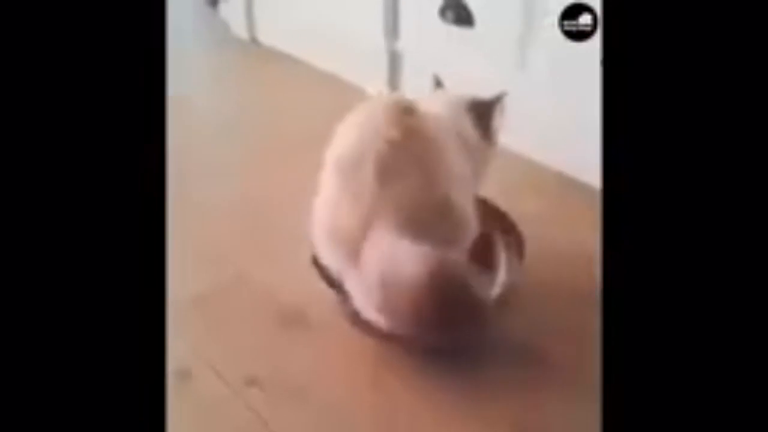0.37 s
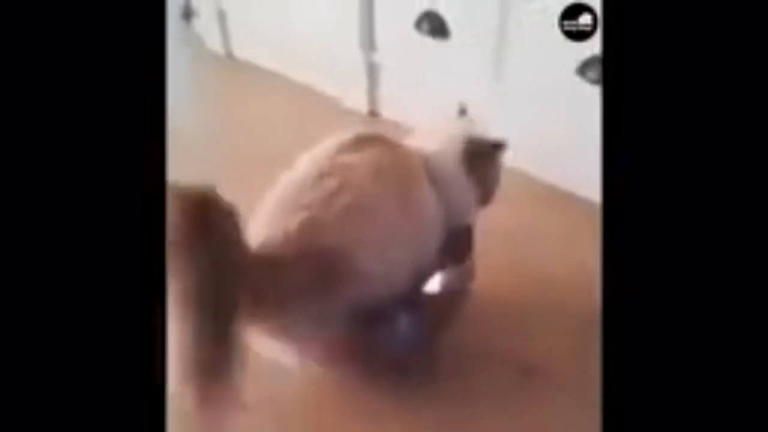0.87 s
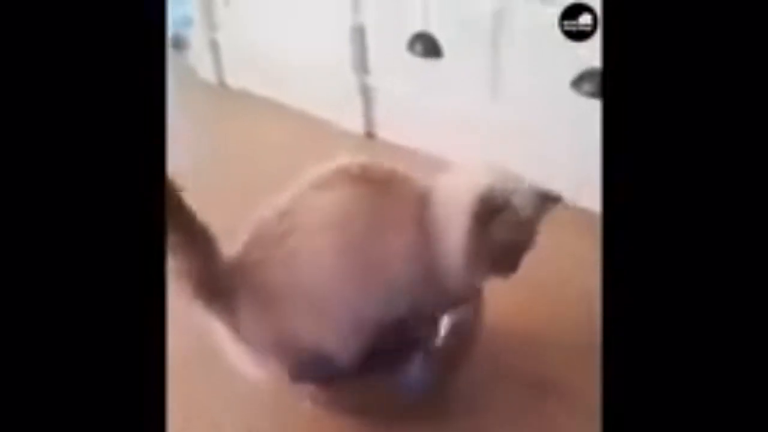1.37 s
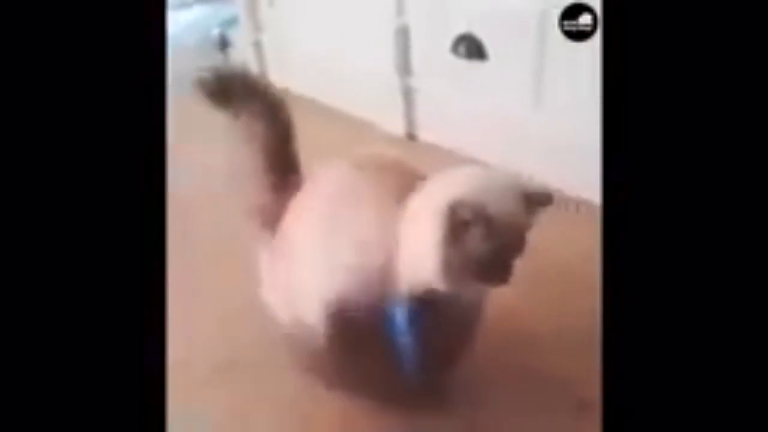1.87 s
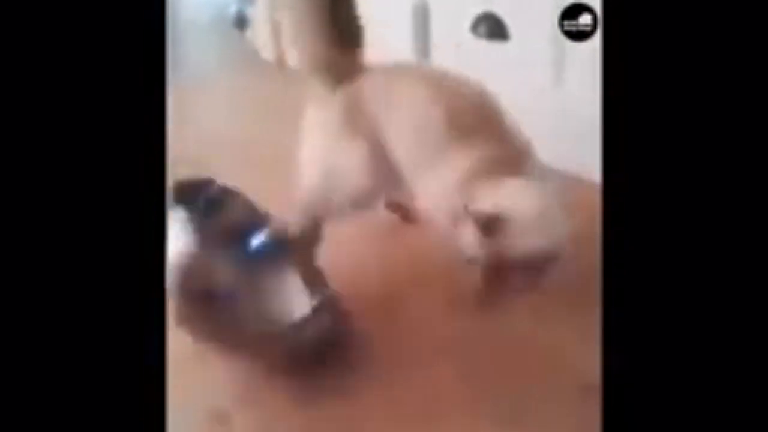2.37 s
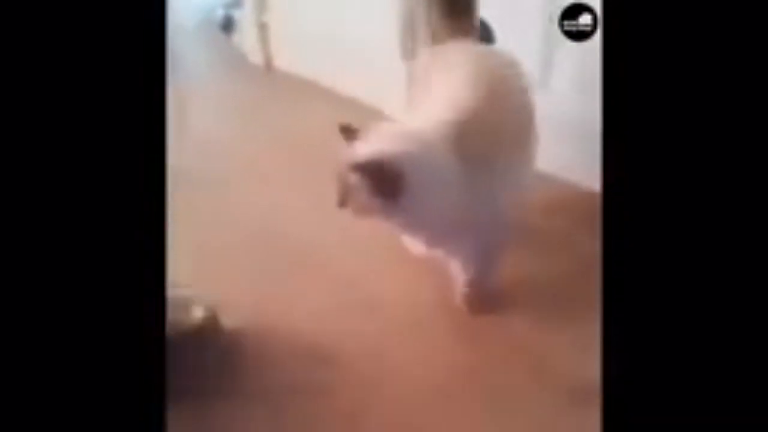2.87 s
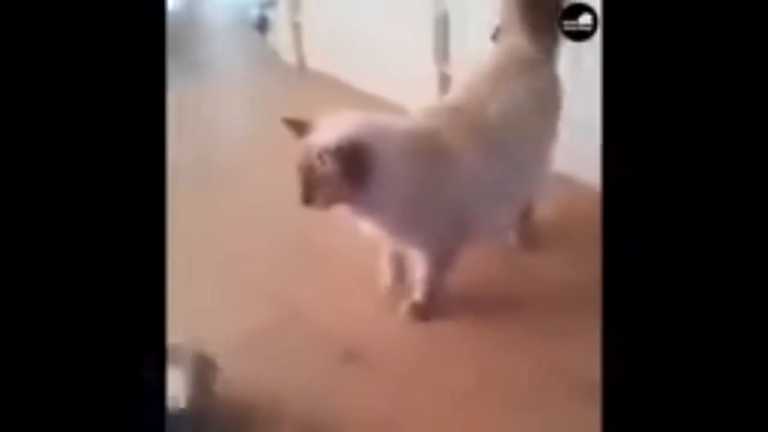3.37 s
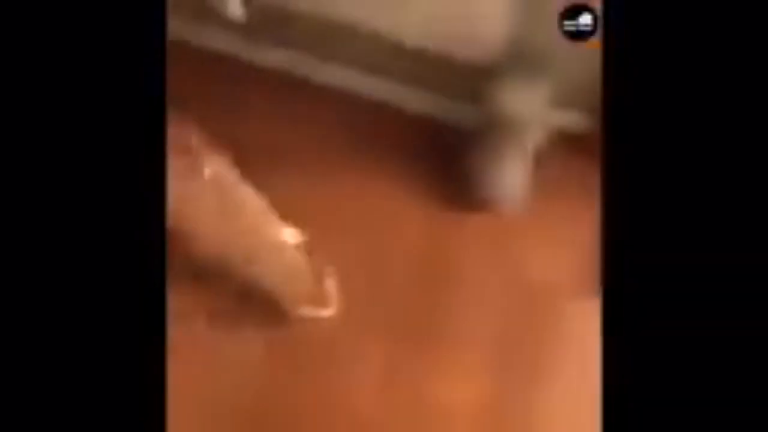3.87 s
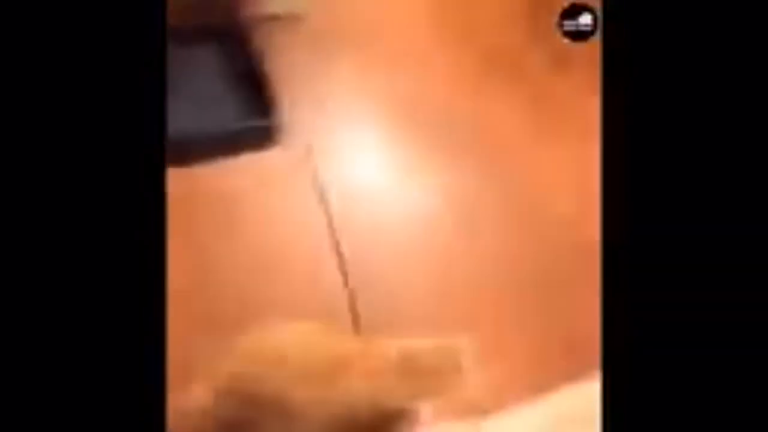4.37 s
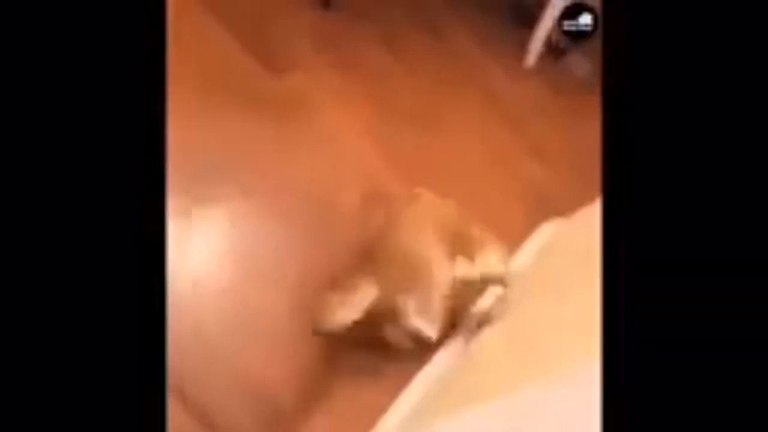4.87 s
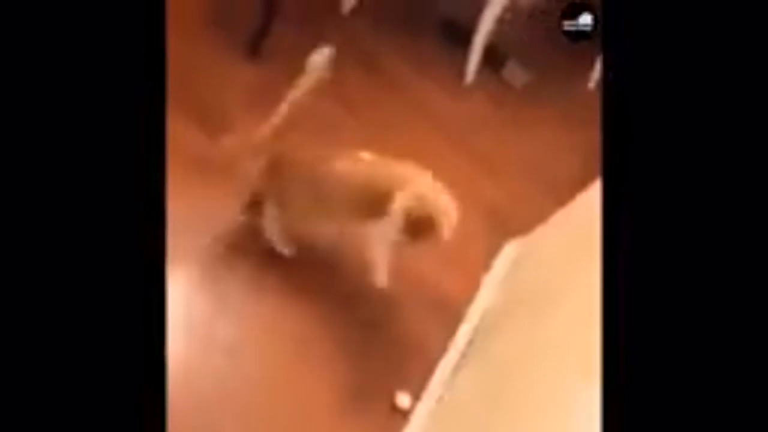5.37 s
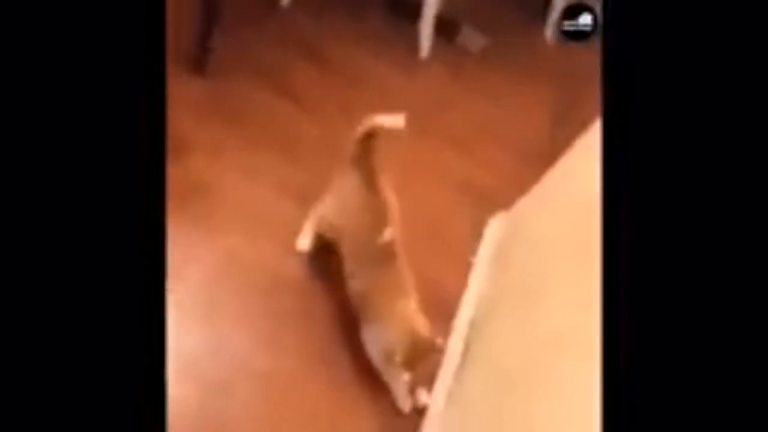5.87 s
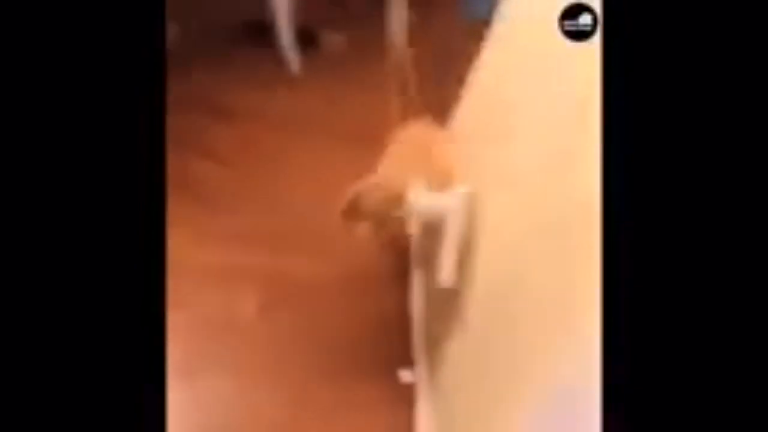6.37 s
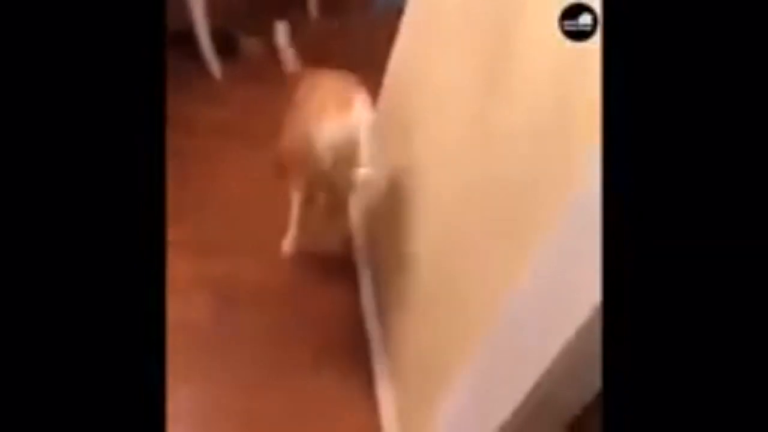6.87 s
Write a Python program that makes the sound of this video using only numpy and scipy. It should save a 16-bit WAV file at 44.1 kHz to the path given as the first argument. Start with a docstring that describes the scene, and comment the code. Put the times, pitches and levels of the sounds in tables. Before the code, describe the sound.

A metal bowl knocks, clinks, scrapes and rolls over a wooden floor, then, after a cut, a cat's claws tick, skid and thump on floorboards.

```python
"""Cat and metal bowl, then cat chasing a pellet

First a cat climbs out of a metal bowl that scrapes, knocks and rolls away over a wooden floor in a hard room,
heard by two spaced microphones. Then another cat chases a pellet over floorboards, heard by one microphone.
Scraping, rolling and skidding are coloured noise under moving envelopes; hard contacts are decaying noise
bursts with room tails; knocks and paw landings ring damped modes of the boards.
"""
import sys
import numpy as np
from scipy import signal
from scipy.fft import rfft, irfft, next_fast_len
from scipy.io import wavfile
from scipy.ndimage import uniform_filter1d, map_coordinates

SR = 44100
rng = np.random.default_rng(int(sys.argv[2]) if len(sys.argv) > 2 else 0)


def int16_out(signal):
    """Quantize to a 16-bit WAV file."""
    q = np.round(np.clip(np.atleast_2d(signal).T, -1, 1) * 32767)
    wavfile.write(sys.argv[1], SR, q.astype(np.int16))


def to_linear_factor(level_db):
    """Convert decibel levels (scalar or array-like) to linear amplitude factors."""
    exponent = np.asarray(level_db, float) / 20
    return 10 ** exponent


N = 319107
TIME = np.arange(N) / SR

# All source levels are relative: the fades and the gain of the bowl's stereo image come after them.
# rim and claw strikes on the bowl: (time [s], rim burst level [dB], body crack re rim [dB],
# room tail re its burst [dB])
BOWL_STRIKES = [(0.6637, -42, -11, -19.5), (1.1001, -43.5, 11.5, -21), (1.2368, -45, -28, -19.5),
                (1.502, -49.5, 12, -15), (1.5388, -11, -16, -15.5), (1.719, -19.5, -25.5, -11),
                (1.7441, -14, -20, -12), (1.7915, -6.5, -16, -15), (1.8054, -32.5, -39.5, -13),
                (1.9734, -33.5, 0, -7), (2.188, -22.5, -14, -12.5), (2.2338, -25, -12.5, -10.5),
                (2.2981, -18.5, -15.5, -9.5), (3.0943, -37.5, -22, -3), (3.2212, -7.5, -22.5, -9.5),
                (3.2357, -13.5, -22.5, -6.5), (3.5296, -16.5, -14.5, -10.5), (3.5422, -19, -38.5, -6.5)]
# the bowl rocks under the cat, then rolls free in surges: (time [s], level [dB])
ROLL_SURGES = [(0.2, -69.5), (0.53, -65), (0.8, -68), (1.07, -59.5), (1.37, -65.5), (1.75, -64),
               (1.89, -47.5), (2.05, -62), (2.28, -49), (2.454, -55), (2.514, -42.5), (2.666, -44),
               (2.83, -61.5), (3.122, -43.5), (3.254, -47), (3.352, -62.5), (3.45, -52), (3.552, -47.5),
               (3.66, -48)]
# spectrum of the ringing and scraping rim: (frequency [Hz], relative level per Hz [dB])
RIM_SPECTRUM = [(2470, -64.5), (4200, -23.5), (5370, -9.5), (5710, -0.5), (6470, 1.5), (7330, 0.5),
                (8910, -3.5), (9550, -6), (10400, -11.5), (10700, -40), (11400, -105.5), (11800, -91),
                (15300, -121), (22000, -120)]
# spectrum of rolling and of the knocks' room tail: (frequency [Hz], relative level per Hz [dB])
ROLL_SPECTRUM = [(65, -47), (110, -5.5), (275, -4.5), (405, -2.5), (721, -6.5), (950, -7), (1180, -12.5),
                 (1350, -12.5), (1760, -19), (2200, -31), (2860, -53.5), (4840, -120)]
# spectrum of claws on wood: (frequency [Hz], relative level per Hz [dB])
CLAW_SPECTRUM = [(1530, -27.5), (2600, -9.5), (3650, 1), (5530, 2.5), (5970, 0.5), (6490, 0.5), (6920, -1),
                 (7470, -1), (9970, -5.5), (11500, -11), (12000, -21), (15600, -51.5), (22000, -120)]
# spectrum of rubbing pads and of the dull part of a claw tick: (frequency [Hz], relative level per Hz [dB])
PAD_SPECTRUM = [(470, -18), (800, -5.5), (967, -11.5), (1130, -6), (1660, -7), (3040, -8.5), (3300, -7.5),
                (4290, -27), (7260, -120)]
# spectrum of board rumble and of the paws' room tail: (frequency [Hz], relative level per Hz [dB])
THUD_SPECTRUM = [(65, -30), (110, -14), (156, -6), (339, -8.5), (376, -7), (593, -6.5), (685, -9.5),
                 (800, -14.5), (1300, -20), (1690, -27), (2860, -120)]


def unit(x):
    """Normalisation: bring the mean power to 1."""
    return x / np.sqrt(np.mean(x ** 2) + 1e-20)


def along(points, hz):
    """Logarithmic frequency scale: read (frequency, value) points between their knots."""
    f, v = np.transpose(points)
    return np.interp(np.log(hz + 1), np.log(f + 1), v)


def curves(rows):
    """Piecewise-linear level in dB: one gain per sample for each column after the time."""
    s, *cols = np.transpose(rows)
    return [to_linear_factor(np.interp(TIME, s, c, left=c[0], right=c[-1])) for c in cols]


def filtered(x, response):
    """Linear filtering: multiply the spectrum by a response of frequency."""
    m = next_fast_len(N + 8192)
    return irfft(rfft(x, m) * response(np.fft.rfftfreq(m, 1 / SR)), m)[..., :N]


def wobble(rate):
    """Random modulation: straight lines between Gaussian knots, rate knots a second."""
    knots = rng.standard_normal(int(N * rate / SR) + 4)
    return map_coordinates(knots, [TIME * rate], order=1)


def rush(colour, channels, grit_db, grit_hz, patchy_db):
    """Friction noise of rms 1, in grains and with random level patches over time and frequency."""
    # likeness of the two channels: (frequency [Hz], correlation [-1 to 1])
    likeness = [(60, 0.67), (150, 0.948), (350, 0.24), (850, -0.146), (2000, 0.232), (5000, -0.084)]
    z = signal.stft(rng.standard_normal((channels, N)), nperseg=1024)[2]
    field = rng.standard_normal(z.shape[1:])
    for axis in (0, 1):
        field = uniform_filter1d(field, size=3, axis=axis)
    noise = signal.istft(z * to_linear_factor(patchy_db * unit(field)), nperseg=1024)[1][:, :N]
    noise = noise * to_linear_factor(grit_db * wobble(grit_hz))
    if channels == 1:
        return unit(filtered(noise, lambda hz: to_linear_factor(along(colour, hz))))

    def mid_side_response(hz):
        turn = np.arccos(np.clip(along(likeness, hz), -1, 1)) / 2  # mid/side split giving this correlation
        return to_linear_factor(along(colour, hz)) * [np.cos(turn), np.sin(turn)]

    mid, side = filtered(noise, mid_side_response)
    return unit(np.array([mid + side, mid - side]))


def swells(times, dbs, rises, falls, rest_db):
    """Power summation of strokes that swell to a peak and sink; rises and falls are seconds per 20 dB."""
    power = to_linear_factor(rest_db) ** 2
    for s, db, rise, fall in np.broadcast(times, dbs, rises, falls):
        drop = 20 * np.maximum((s - TIME) / abs(rise), (TIME - s) / abs(fall))
        power = power + to_linear_factor(db - drop) ** 2
    return np.sqrt(power)


def decays(times, dbs, t60s, rises):
    """Exponential decay: the envelope of overlapping bursts with soft starts, summed in power."""
    power, t = np.zeros(N + SR), TIME[:SR // 2]
    for s, db, t60, rise in np.broadcast(times, dbs, t60s, rises):
        burst = to_linear_factor(db - 60 * t / t60) * (1 - np.exp(-(t / rise) ** 2))
        power[round(s * SR):][:len(t)] += burst ** 2
    return np.sqrt(power[:N])


def spread(x, channels):
    """Arrival-time difference: direct sound reaches the nearer of two microphones first."""
    # the bowl rolls to the left: (time [s], lag of the left channel [s])
    left_lag = [(1.9, .00058), (2.3, 0), (2.7, -.00015)]
    late = np.arange(N) - np.round(SR * np.interp(TIME, *np.transpose(left_lag))).astype(int)
    return np.array([x[np.clip(late, 0, N - 1)], x][-channels:])


def ticks(rows, bright, dull, channels, t60, bright_t60, dull_t60, patchy_db, rise_s):
    """Impact of hard bodies: dry bursts in treble and body, each exciting its own reverberant tail."""
    s, db, crack_db, room_db = np.transpose(rows)
    start = s - rise_s
    out = 0
    for colour, level_db, tail_t60 in ((bright, db, bright_t60), (dull, db + crack_db, dull_t60)):
        grit = rush(colour, 1, grit_db=4.5, grit_hz=909.2, patchy_db=0.5)[0]
        grit /= np.sqrt(np.abs(uniform_filter1d(grit ** 2, size=150)))  # every contact bites at full strength
        room = rush(colour, channels, grit_db=1.0, grit_hz=305.0, patchy_db=patchy_db)
        out = out + spread(decays(start, level_db, t60, rise_s) * grit, channels)
        out = out + decays(start, level_db + room_db, tail_t60, rise_s + 0.00568) * room
    return out


def thumps(rows, colour, channels, room_t60, delay_s):
    """Modal excitation: soft blows ring the board modes nearest their centre; a low room tail answers."""
    # floorboard modes: (frequency [Hz], relative level [dB], t60 [s])
    boards = [(75, -16, 0.11), (139.9, -15, 0.193), (177.88, -0.5, 0.1338), (277.8, 5.5, 0.038),
              (363.4, -2.5, 0.109), (471, 6.5, 0.0483), (562.2, 6, 0.0336), (772.4, 8.5, 0.0261),
              (1063, 6, 0.0205), (1441, 4.5, 0.0234)]
    hz, mode_db, t60 = np.transpose(boards)
    ring, t = np.zeros(N + SR), TIME[:SR // 4, None]
    luck = rng.standard_normal((len(rows), len(hz)))
    for (s, db, centre_hz, _, breadth), scatter in zip(rows, luck):
        # the hard edge of a blow reaches every mode
        share = np.exp(-(np.log(hz / centre_hz) / breadth) ** 2) + 0.0746
        share = share * to_linear_factor(mode_db + 3 * scatter)
        blow = (share * to_linear_factor(-60 * t / t60) * np.sin(2 * np.pi * hz * t)).sum(axis=1)
        blow = blow * (1 - np.exp(-t[:, 0] / .0005))
        # the ring starts delay_s after the listed time
        ring[round((s + delay_s) * SR):][:len(t)] += to_linear_factor(db) * blow / np.abs(blow).max()
    s, db, _, room_db, _ = np.transpose(rows)
    room = rush(colour, channels, grit_db=2.5, grit_hz=57.9, patchy_db=1)
    low = filtered(room, lambda f: 1 / (1 + (f / 670) ** 4))  # split at 670 Hz
    low_tail = decays(s + delay_s, db + room_db, room_t60, 0.00237) * low
    upper_tail = decays(s + delay_s, db + room_db, .65 * room_t60, 0.00237) * (room - low)
    return spread(ring[:N], channels) + low_tail + upper_tail


def bowl_strikes():
    """Impact on metal: rim and claws strike a bright rim and a duller body."""
    # spectrum of the bowl's body: (frequency [Hz], relative level per Hz [dB])
    body_spectrum = [(350, -37.5), (600, -3), (1270, -6.5), (2250, -12.5), (3050, -7), (3540, -11.5),
                     (4800, -10), (6240, -31.5), (10600, -120)]
    return ticks(BOWL_STRIKES, RIM_SPECTRUM, body_spectrum, 2, t60=0.02726, bright_t60=0.2215,
                 dull_t60=0.2614, patchy_db=7.5, rise_s=0.00312)


def bowl_scrape():
    """Sliding friction: rim and fur drag over the boards; short scrape noise surrounds each strike."""
    # drags: (peak time [s], level [dB], time to swell 20 dB [s], time to sink 20 dB [s]), signs ignored
    drags = [(0.68, -51, 0.2965, 0.1438), (1.27, -60.5, 1.12, 0.14), (1.62, -46, 0.056, 0.46),
             (2.0, -47, .5, 0.13), (2.14, -50, 0.14, -0.22), (2.37, -45.5, 0.0179, 0.3922),
             (2.67, -49, 0.75, 0.09), (2.99, -48.5, 0.1632, -1), (3.13, -47, 0.1267, 1.5),
             (3.215, -32.5, 0.001, 0.0756), (3.5, -53.5, .5, 2.58)]
    strokes = swells(*np.transpose(drags), rest_db=-77)
    s, db = np.transpose(BOWL_STRIKES)[:2]
    around_strikes = swells(s, db - 19.5, 0.0079, 0.1431, rest_db=-120)  # dies away after each strike
    scrape = np.hypot(strokes, around_strikes) * to_linear_factor(0.52 * wobble(27))
    return scrape * rush(RIM_SPECTRUM, 2, grit_db=0.0, grit_hz=519, patchy_db=6.5)


def bowl_roll():
    """Rolling noise through resonances: the surging contact noise makes the hollow bowl sing."""
    # the hollow bowl's resonances: (centre frequency [Hz], width [Hz], relative level [dB])
    hollow = [(200, 25, -7.5), (313.5, 50, -2), (587, 23, -4), (743, 27, -3), (866.6, 21, -4.5),
              (1156.9, 20, 3.5)]

    def sings(f):
        response = 0.56  # share that passes without resonance
        for c, w, db in hollow:
            response = response + to_linear_factor(db) * 1j * f * w / (c * c - f * f + 1j * f * w)
        return response

    contact = rush(ROLL_SPECTRUM, 2, grit_db=1.5, grit_hz=90, patchy_db=3.5)
    return curves(ROLL_SURGES)[0] * to_linear_factor(0.87 * wobble(22)) * unit(filtered(contact, sings))


def bowl_knocks():
    """Modal excitation: the bowl knocks the boards, which ring near the centre of each knock."""
    # knocks: (time [s], peak [dB], centre [Hz], room tail re peak [dB], breadth [ln Hz])
    knocks = [(0.195, -43.5, 400, -12.5, 1), (0.234, -40.5, 289, -28, 0.353),
              (0.295, -47, 450, -15.5, 0.62), (0.389, -40.5, 420, -12.5, 0.8),
              (0.668, -45, 198, -17.5, 0.59), (0.839, -45.5, 476, -12.5, 0.84),
              (0.933, -40, 372, -21.5, 0.49), (0.997, -36.5, 174, -19, 1), (1.095, -39.5, 517, -10, 0.55),
              (1.499, -37, 874, -17, 0.29), (1.534, -37, 450, -10, 0.424), (1.699, -51, 334, 0.5, 0.46),
              (1.74, -42, 456, -19, 0.56), (1.785, -36, 488, -28.5, 0.2), (1.882, -36, 128.1, -11.5, 0.215),
              (1.985, -34, 452, -11, 0.25), (2.056, -34.5, 159, -20.5, 1), (2.183, -40, 571, -10.5, 0.35),
              (2.256, -30.5, 480, -31.5, 0.172), (2.262, -36, 140.5, -22, 0.147),
              (3.424, -44, 195, -7.5, 0.215), (3.541, -29, 185, -19.5, 0.87)]
    return thumps(knocks, ROLL_SPECTRUM, 2, room_t60=0.26, delay_s=.003)


def bowl_room():
    """Background noise: a steady low hum, and treble air that follows a share of the rolling's dB swing."""
    # spectrum of the room's air: (frequency [Hz], relative level per Hz [dB])
    air_spectrum = [(820, -21), (1400, -5.5), (3000, -4.5), (3580, -2), (4030, -7.5), (6530, -6),
                    (8780, -19), (11100, -7.5), (11900, -34), (15500, -73), (22000, -120)]
    # spectrum of the room's hum: (frequency [Hz], relative level per Hz [dB])
    hum_spectrum = [(13, -36.5), (22, 5.5), (54, -2.5), (81, -8), (113, -8), (134, -12.5), (160, -5.5),
                    (210, -27), (350, -120)]
    roll, = curves(ROLL_SURGES)
    air = to_linear_factor(-62) * (roll / np.median(roll)) ** 0.2234
    sound = air * rush(air_spectrum, 2, grit_db=0.5, grit_hz=196, patchy_db=5)
    return sound + to_linear_factor(-65) * rush(hum_spectrum, 2, grit_db=2.0, grit_hz=8, patchy_db=1.5)


def spaced_pair(sound):
    """Wavelength and spacing: the two channels differ in level, and merge in the bass."""
    # balance of the channels: (frequency [Hz], left minus right [dB])
    lean = [(60, -3), (170, 0.5), (500, -2), (1450, -1.5), (4180, 0), (12100, -2.5)]
    left, right = to_linear_factor(2.5) * filtered(sound, lambda hz: to_linear_factor(along(lean, hz) * [[.5], [-.5]]))
    # long waves press both microphones alike
    side = filtered((left - right) / 2, lambda hz: 1 / (1 + (150 / (hz + 1)) ** 2))
    return (left + right) / 2 + np.array([side, -side])


def bowl():
    """Superposition of the bowl's contacts and its room, heard by two spaced microphones."""
    return spaced_pair(bowl_strikes() + bowl_scrape() + bowl_roll() + bowl_knocks() + bowl_room())


def claw_ticks():
    """Impact on wood: each claw gives a short bright burst, a dull crack and their room tails."""
    # ticks: (time [s], claw burst level [dB], body crack re claw [dB], room tail re its burst [dB])
    claws = [(3.7858, -33, -21.5, -16.5), (3.9154, -35, -16, -4.5), (4.057, -28, -25, -16.5),
             (4.0684, -24, -14.5, -8), (4.3012, -26, -17.5, -15.5), (4.3174, -44.5, -1.5, -8.5),
             (4.4154, -42, -4.5, -8.5), (4.567, -36.5, -16.5, -12), (4.7027, -27.5, -13, -18),
             (4.827, -36, -9, -1), (4.8589, -31, -12.5, -21), (4.923, -41, -3, -6.5),
             (4.9725, -37.5, 7.5, -18.5), (5.121, -38, -1.5, -7.5), (5.136, -16.5, -16, -13),
             (5.226, -20, -20.5, -13), (5.294, -30, -23, -14), (5.3794, -24, -19, -9.5),
             (5.424, -30, -17, -9.5), (5.54, -26.5, -11.5, -9.5), (5.5674, -22, -14.5, -27),
             (5.7764, -21, 5, -21), (5.8477, -28.5, -6.5, -15.5), (5.9924, -53, -2.5, -9.5),
             (6.0774, -23.5, -12, -20.5), (6.4088, -41, -8.5, -13.5), (6.555, -27.5, 0, -17),
             (6.6401, -26, -3.5, -15), (6.8074, -41.5, 2.5, -11.5), (6.8368, -48, -0.5, -13.5),
             (6.947, -48, -12.5, -10.5), (6.9913, -48.5, 0.5, -12), (7.206, -57, -11, -7)]
    return ticks(claws, CLAW_SPECTRUM, PAD_SPECTRUM, 1, t60=0.0263, bright_t60=0.209, dull_t60=0.2615,
                 patchy_db=4.5, rise_s=0.00231)


def paw_thumps():
    """Modal excitation: soft paws land and ring the floorboards."""
    # landings: (time [s], peak [dB], centre [Hz], room tail re peak [dB], breadth [ln Hz])
    paws = [(3.955, -43, 607, -6, 0.48), (4.052, -40.5, 802, -7.5, 0.43), (4.224, -37.5, 500, -11.5, 0.47),
            (4.296, -34.5, 576, -16, 0.395), (4.317, -34.5, 506, -12.5, 0.32),
            (4.429, -32.5, 272, -8, 0.695), (4.564, -35, 587, -8.5, 0.48), (4.658, -32, 370, -12.5, 0.71),
            (4.804, -29.5, 167, -11, 0.83), (4.839, -28, 456, -9, 0.315), (4.969, -28, 567, -9.5, 1),
            (5.115, -32.5, 702, -21, 0.3), (5.134, -30, 650, -11, 0.28), (5.181, -25.5, 873, -12.5, 0.37),
            (5.424, -40.5, 690, -13, 0.31), (5.779, -23, 475, -3.5, 0.28), (5.846, -27, 570, -8.5, 0.91),
            (5.861, -30, 156, -7.5, 0.56), (6.074, -36.5, 300, -4, 0.61), (6.366, -53, 821, -8, 0.49),
            (6.553, -38.5, 473, -4.5, 0.555), (6.645, -31, 175, -6.5, 0.78),
            (6.838, -23.5, 168.2, -13, 0.66), (7.205, -54, 420, -8.5, 0.61)]
    return thumps(paws, THUD_SPECTRUM, 1, room_t60=0.1788, delay_s=0.003023)


def skidding():
    """Sliding friction: claws skid and pads rub under one shared random stroke."""
    # skids: (peak time [s], claws [dB], time to swell 20 dB [s], time to sink 20 dB [s], pads [dB]),
    # signs of the times ignored
    skids = [(3.8, -53.5, 0.7, .5, -54), (3.95, -50, .5, 0.0253, -59), (4.17, -45, 0.0643, 0.0646, -56.5),
             (4.42, -46.5, 0.1034, -0.0964, -66.5), (4.62, -52.5, 0.13, 0.02, -66),
             (4.7, -53, 0.2233, 0.04, -57), (4.87, -52, 0.18, 0.05, -59), (4.96, -51, 0.09, -0.07, -57.5),
             (5.2, -46, 0.0841, .5, -47.5), (5.31, -48, 0.3577, 0.1, -55.5), (5.47, -49, 0.09, 0.1079, -50),
             (5.541, -28.5, 0.0685, 0.076, -43), (5.82, -51.5, -0.11, 0.2278, -57.5),
             (6.28, -60.5, 1.13, 0.1, -66), (6.57, -51, 0.075, 0.0767, -62.5),
             (6.7, -59.5, 0.62, 0.44, -67.5)]
    s, claw_db, rise, fall, pad_db = np.transpose(skids)
    skid = swells(s, claw_db, rise, fall, rest_db=-79.5)
    rub = swells(s, pad_db, rise, fall, rest_db=-75)
    stroke = to_linear_factor(1.7 * wobble(30))  # claws and pads slip together
    sound = skid * stroke * rush(CLAW_SPECTRUM, 1, grit_db=2.5, grit_hz=600, patchy_db=2.2)
    return sound + rub * stroke * rush(PAD_SPECTRUM, 1, grit_db=4, grit_hz=300, patchy_db=3)


def floor_shaking():
    """Forced vibration: the cat's weight comes down, the joists boom and the boards rumble."""
    # bounds: (peak time [s], joist boom [dB], time to swell 20 dB [s], time to sink 20 dB [s],
    # board rumble [dB])
    bounds = [(4.155, -46, 0.2333, 0.05, -56), (4.27, -51.5, 0.18, 0.36, -60),
              (4.5, -55.5, 0.86, 0.28, -61.5), (4.62, -48, 0.06, 0.1647, -50.5),
              (4.91, -43, 0.1561, 0.1134, -45.5), (5.04, -51, 0.29, 0.04, -55.5),
              (5.18, -45, 0.08, 0.09, -43.5), (5.32, -71, 0.12, 0.2434, -51),
              (5.41, -45, 0.06, 0.0661, -52.5), (5.52, -67.5, 0.63, 0.0058, -54.5),
              (5.875, -36, 0.0615, 0.13, -51.5), (6.1, -44, .015, 0.15, -63),
              (6.69, -42, 0.0556, 0.16, -60), (6.895, -44, 0.2, 0.07, -54),
              (7.02, -51.5, 0.23, 0.14, -62.5)]
    # spectrum of the joists: (frequency [Hz], relative level per Hz [dB])
    boom_spectrum = [(20, -41), (38, -13.5), (48, -3.5), (60, -14), (73, -1.5), (88, -17), (120, -13),
                     (170, -36), (290, -120)]
    s, boom_db, rise, fall, rumble_db = np.transpose(bounds)
    boom = swells(s, boom_db, rise, fall, rest_db=-66)
    rumble = swells(s, rumble_db, rise, fall, rest_db=-68.5)
    joists = rush(boom_spectrum, 1, grit_db=-0.5, grit_hz=30, patchy_db=0.0)
    joists /= np.sqrt(np.abs(uniform_filter1d(joists ** 2, size=2600)))  # they swing evenly while shaken
    return boom * joists + rumble * rush(THUD_SPECTRUM, 1, grit_db=3, grit_hz=72.61, patchy_db=2.0)


def chase():
    """Superposition of claws, paws and the shaken floor at one microphone."""
    return claw_ticks() + paw_thumps() + skidding() + floor_shaking()


def scene():
    """Succession: each scene under its own fade; the single microphone feeds both channels."""
    # fade of the bowl: (time [s], gain [dB])
    bowl_fade = [(.045, -60), (.055, -14.5), (.2, 1), (3.672, 1.5), (3.69, -18), (3.715, -43)]
    # fade of the chase: (time [s], gain [dB])
    chase_fade = [(3.755, -65.5), (3.768, -8), (3.79, -1), (7.232, -1), (7.236, -55.5)]
    return curves(bowl_fade)[0] * bowl() + curves(chase_fade)[0] * chase()


def top_cut(x):
    """Nothing passes above the cut-off."""
    return signal.sosfilt(signal.butter(12, 12660, fs=SR, output="sos"), x)


def record(dry):
    """Band limitation: the microphones fade in the deepest bass and the top treble."""
    heard = filtered(dry, lambda hz: 1 / (1 + (30 / (hz + 1)) ** 4) / (1 + (hz / 11700) ** 60))
    return top_cut(heard)


dry = scene()
out = record(dry)
int16_out(out)
```